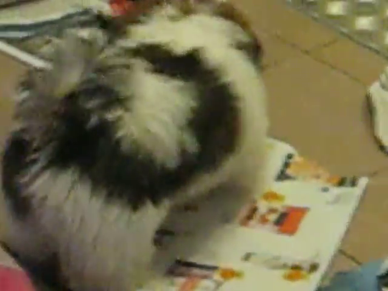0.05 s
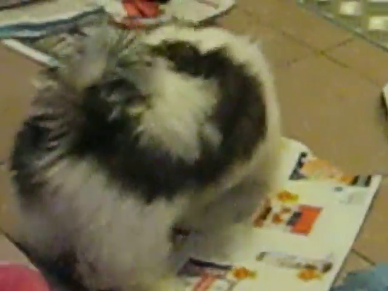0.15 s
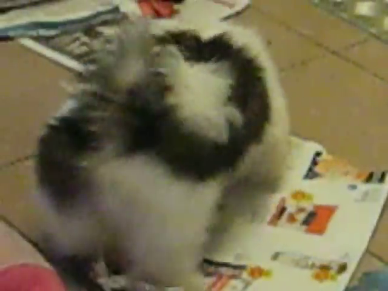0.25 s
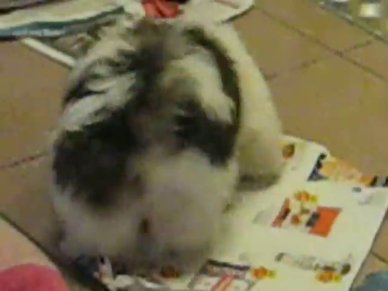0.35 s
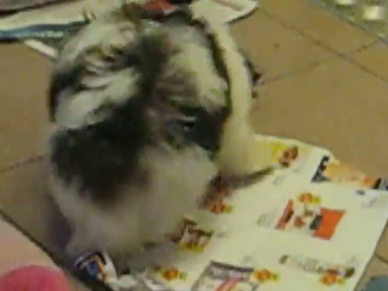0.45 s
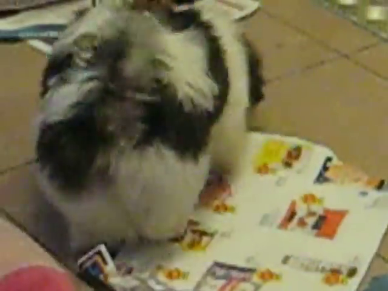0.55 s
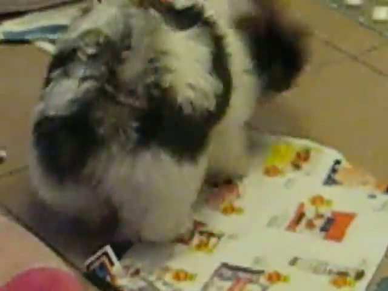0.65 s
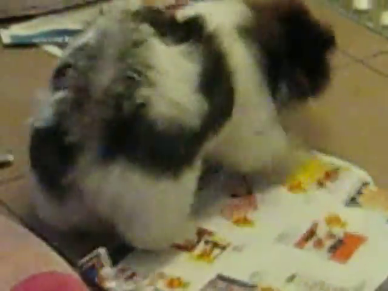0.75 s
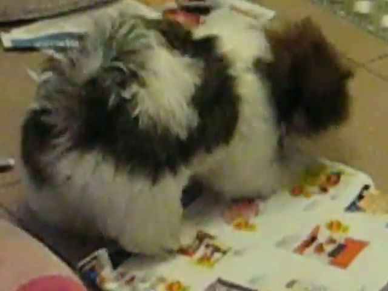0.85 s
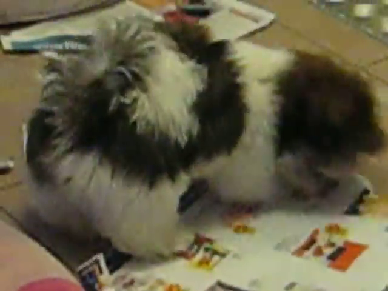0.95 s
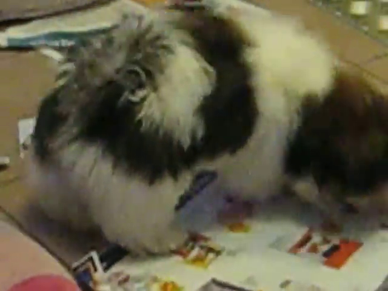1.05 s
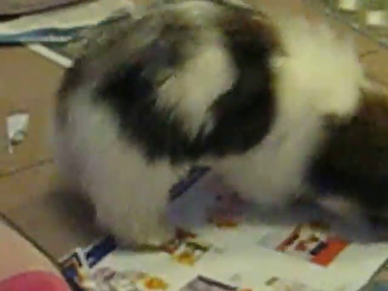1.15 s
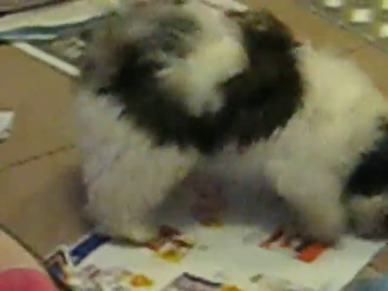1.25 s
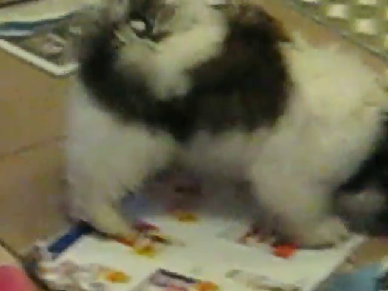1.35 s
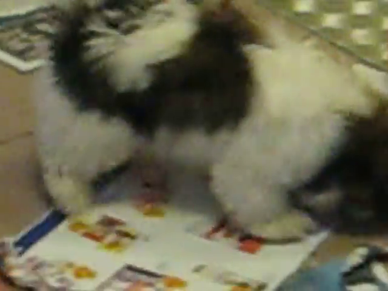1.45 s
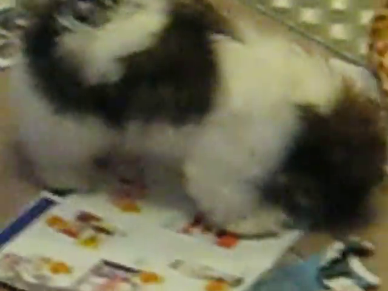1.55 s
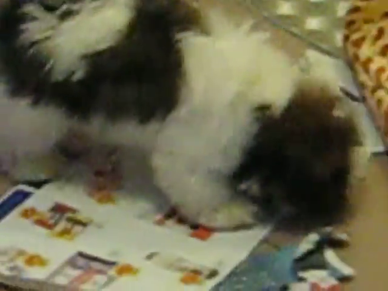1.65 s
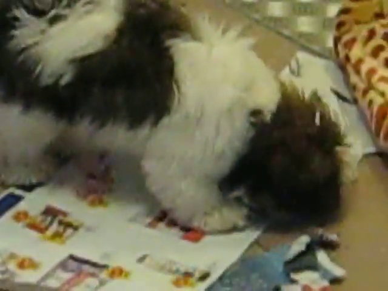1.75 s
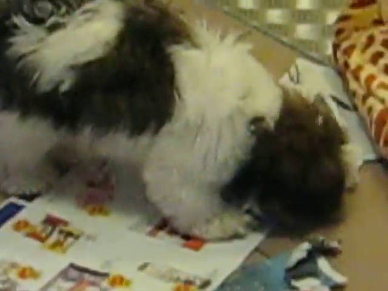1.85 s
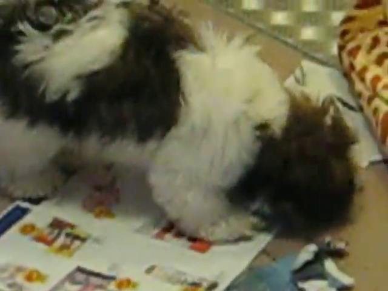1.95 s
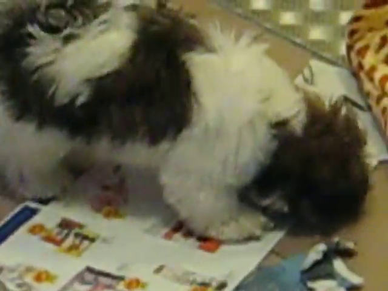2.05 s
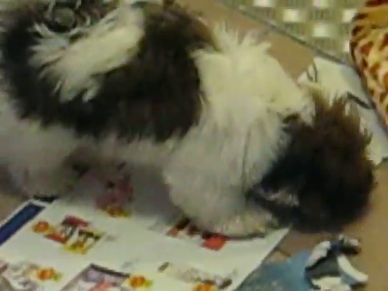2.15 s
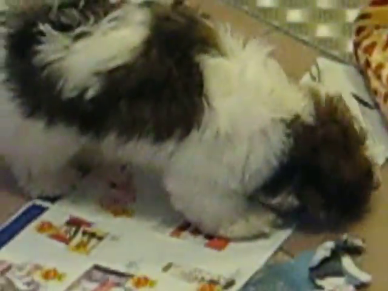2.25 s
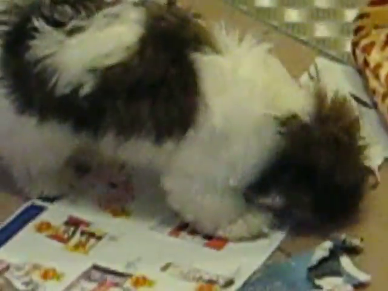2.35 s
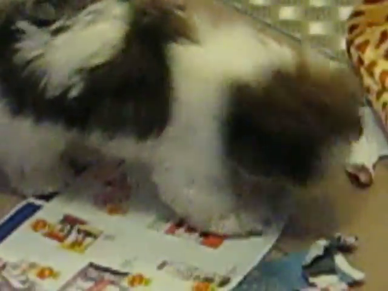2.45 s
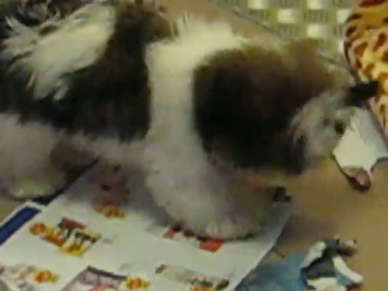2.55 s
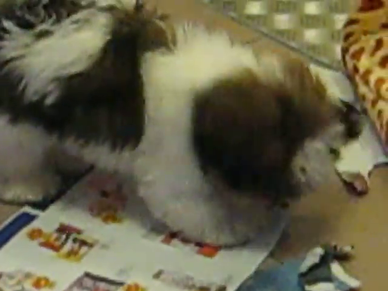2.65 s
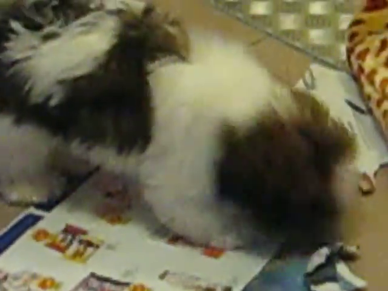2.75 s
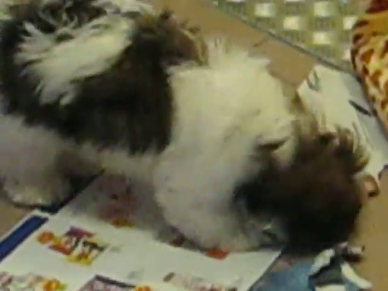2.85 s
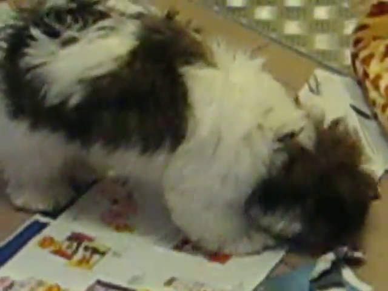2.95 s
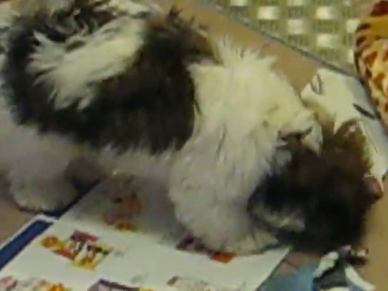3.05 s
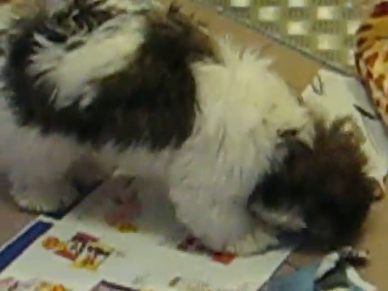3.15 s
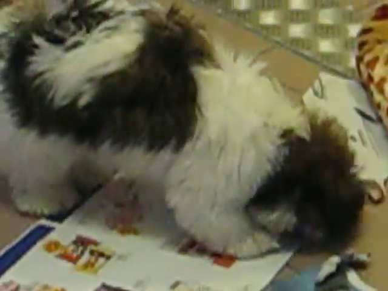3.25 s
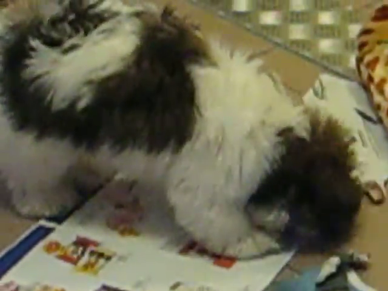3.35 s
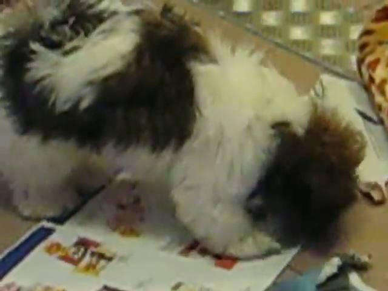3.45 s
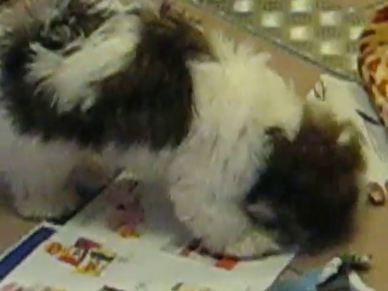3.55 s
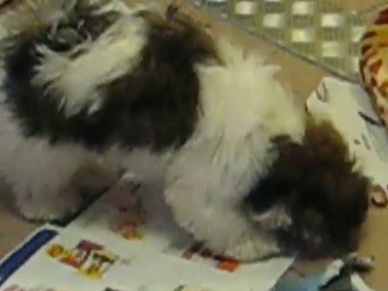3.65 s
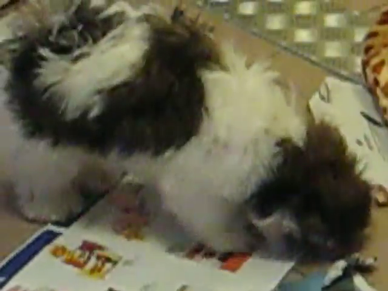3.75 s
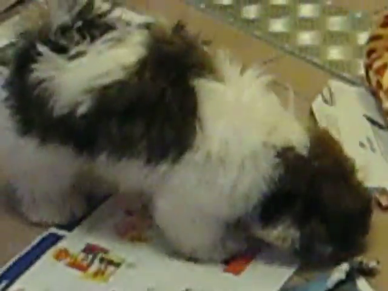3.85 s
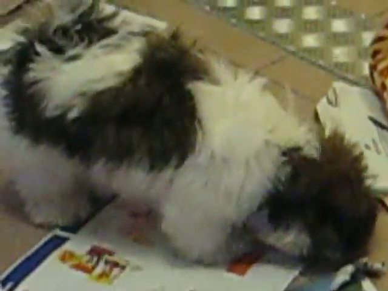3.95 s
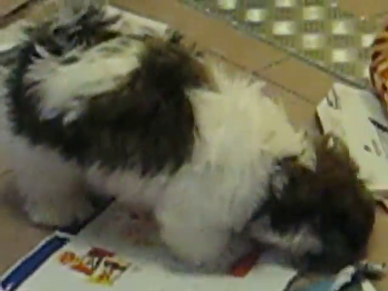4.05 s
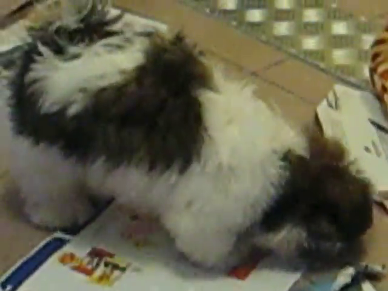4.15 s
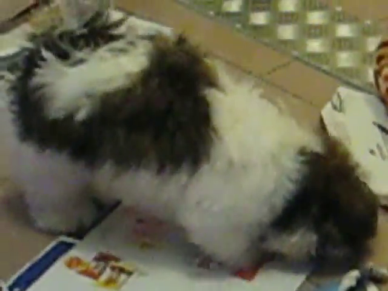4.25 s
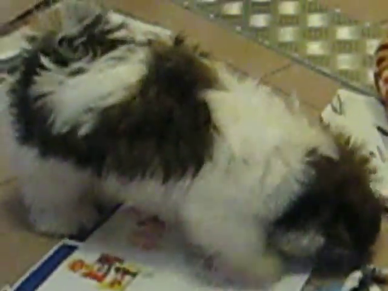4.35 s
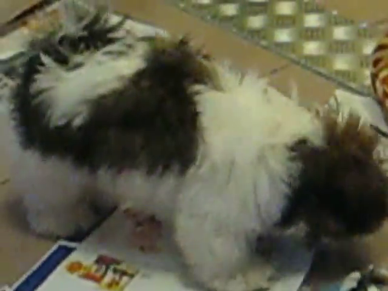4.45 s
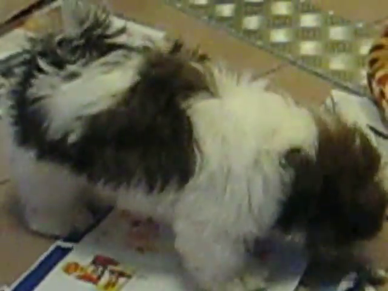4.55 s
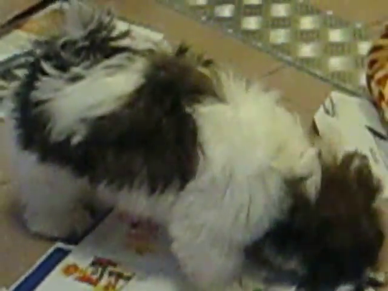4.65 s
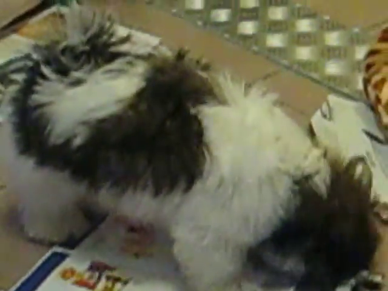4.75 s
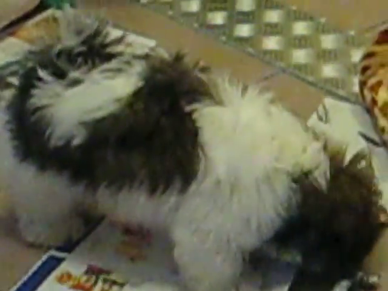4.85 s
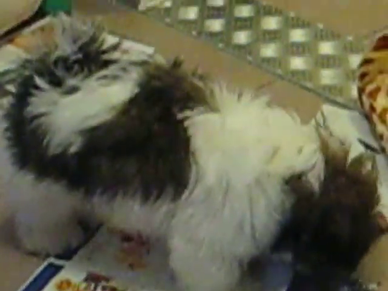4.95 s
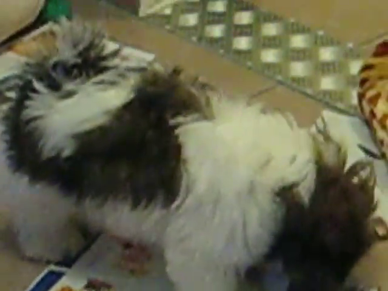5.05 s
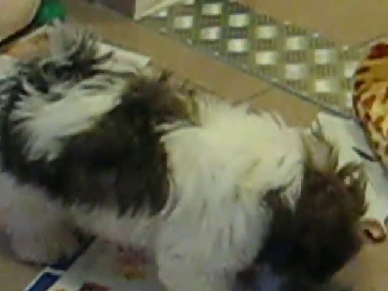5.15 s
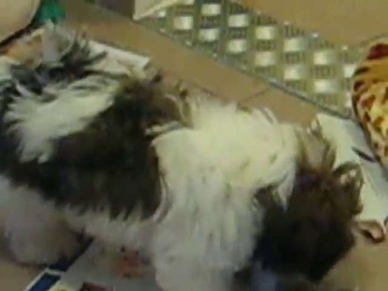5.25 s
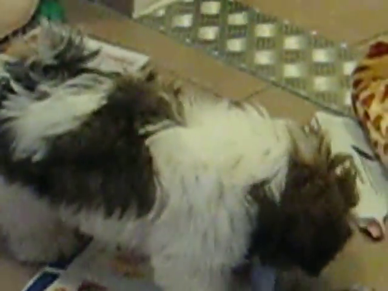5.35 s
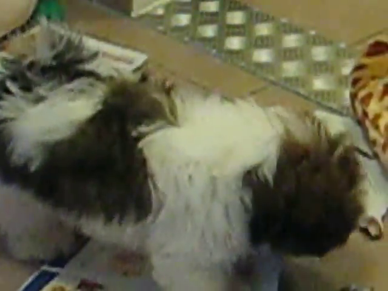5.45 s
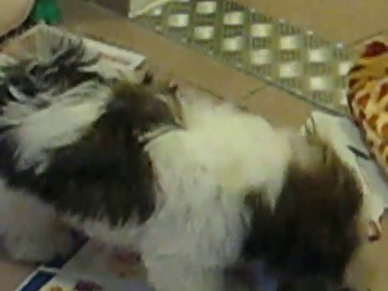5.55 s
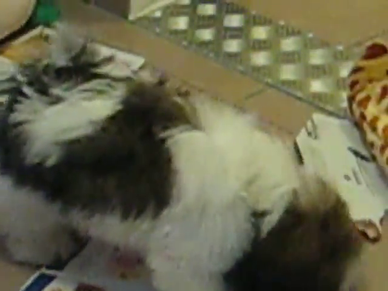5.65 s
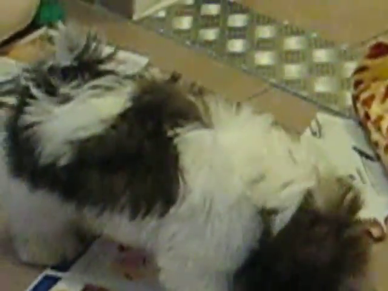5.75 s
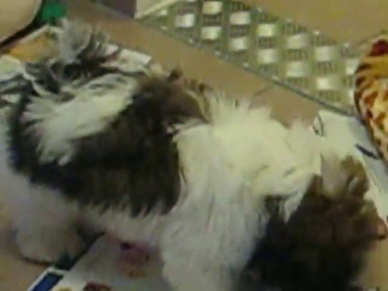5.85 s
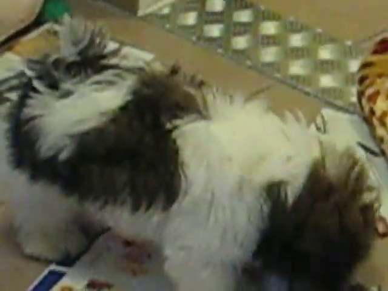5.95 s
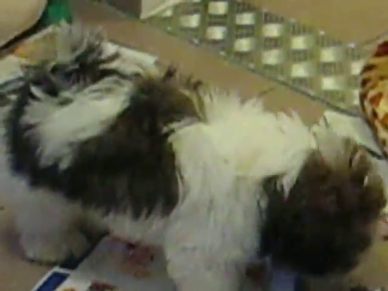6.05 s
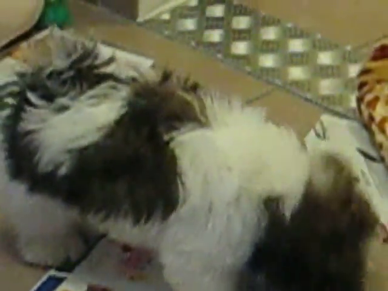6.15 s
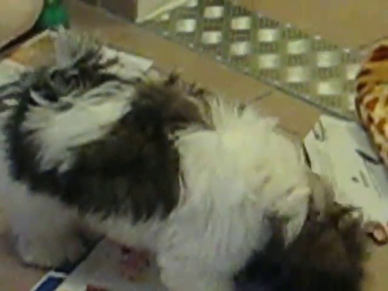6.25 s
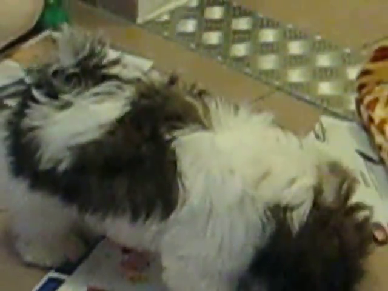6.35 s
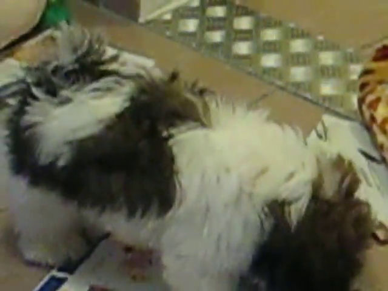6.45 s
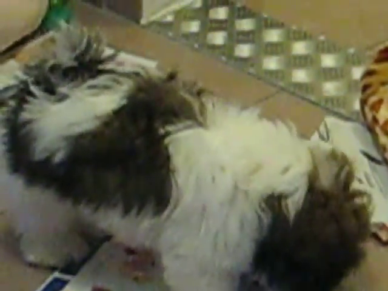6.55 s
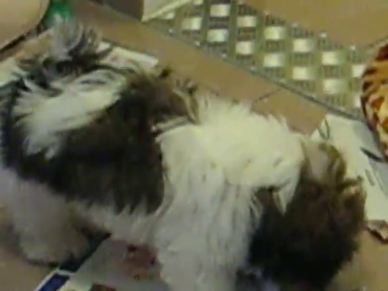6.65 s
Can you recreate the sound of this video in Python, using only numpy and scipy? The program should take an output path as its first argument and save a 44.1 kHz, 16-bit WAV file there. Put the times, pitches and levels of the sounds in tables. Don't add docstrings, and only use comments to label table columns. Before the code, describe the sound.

A puppy handles a sheet of paper on a tiled hallway floor, heard close through a small mono camera microphone. Constant soft hiss and a thin, high, finely pulsing whine lie beneath. Faint rustling opens, with small crackles near 0.4 seconds, a bright snap at 0.75, and a claw scuff with paper crackle around 1.1. Lighter ticks follow at 1.3 and 1.8. At 2.4 a sharp, crisp rip bursts out and quickly settles. It is nearly quiet until a small tick at 3.85 and a hard crease snap at 4.0. From 4.3 chewing brings uneven crinkles and little knocks, with a stronger crunch at 5.35. From about 5.6 to 6.7, rapid tugs tear the paper in dense, crackling bursts, strongest near 5.6, 5.9 and 6.2, with scuffs and a short hallway ring.

```python
import sys
import numpy as np
from scipy import signal
from scipy.fft import rfft, irfft
from scipy.io import wavfile
from scipy.ndimage import uniform_filter1d

SR = 44100
rng = np.random.default_rng(int(sys.argv[2]) if len(sys.argv) > 2 else 0)


def master_out(mix):
    frames = np.transpose(np.atleast_2d(mix))
    ceiling = np.clip(frames, -1, 1)
    pcm = np.round(ceiling * 32767).astype(np.int16)
    wavfile.write(sys.argv[1], SR, pcm)


def magnitude_from_level(level_db):
    exponent = np.asarray(level_db, float) / 20
    return 10 ** exponent


N = 295470

PARTS_HZ = (5670, 714, 2230, 10370)
# (frequency [Hz], gain [dB])
PAPER_SPECTRUM = [(120, -23.5), (250, -18), (400, -7), (800, -6), (5000, 2.5), (10000, 1), (13000, -5.5),
                  (16300, -19.5), (16750, -60)]


def read(points, hz):
    f, value = np.transpose(points)
    return np.interp(np.log(hz + 1), np.log(f + 1), value)


def evened(x):
    return x / np.sqrt(np.mean(x ** 2) + 1e-20)


def add(mix, start_s, sound):
    part = mix[round(start_s * SR):][:len(sound)]
    part += sound[:len(part)]


def coloured(x, gain):
    return irfft(rfft(x) * gain, len(x))


def effort():
    # (peak time [s], effort [dB], rise time [s], fall time [s],
    # tilt [dB/octave])
    moves = [(0.0, -49.5, .01, 0.089, 4), (0.35, -56, 0.54, .1, 5), (0.465, -39.5, 0.14, 0.11, 5.5),
             (0.62, -49.5, 0.54, 0.29, 4), (0.74, -48.5, 0.078, 0.074, 11),
             (0.756, -38.5, 0.0063, 0.14, 13), (1.07, -43.5, .002, .3, 4), (1.3, -47, .002, 0.13, 11),
             (1.51, -53, 0.15, 0.11, 5.5), (1.772, -59.5, 0.0018, 0.64, 15), (2.3, -57.5, 0.18, .2, 3),
             (2.37, -40.5, .002, 0.086, -3), (2.391, -29, 0.0022, 0.11, 0.8),
             (2.423, -29.5, .03, 0.067, 1.5), (2.456, -33.5, 0.076, 0.11, -2.5),
             (2.77, -57.5, 0.092, 0.17, 3), (3.845, -56, 0.0015, 0.3, 1), (3.979, -40, .002, 0.18, 6.5),
             (4.202, -43, .002, 0.03, 1.5), (4.229, -44, .002, 0.16, 4.5),
             (4.335, -35.5, 0.0019, 0.065, .1), (4.357, -37.5, 0.017, 0.13, -0.4),
               (4.64, -52, 0.13, 0.056, -1.2), (4.66, -48, .002, 0.054, -5), (4.76, -51.5, 0.12, 0.11, 0),
               (4.811, -40, 0.0015, 0.012, .1), (4.845, -41, 0.016, 0.036, -4.5),
               (4.905, -43, 0.066, 0.11, 1.5), (5.015, -40, .002, 0.011, -3),
               (5.051, -51.5, .01, 0.038, -6.5), (5.18, -50.5, 0.26, .05, -2),
               (5.191, -39.5, .002, 0.033, 2), (5.266, -38.5, 0.096, 0.028, -0.6),
               (5.346, -27, 0.0071, 0.036, -0.3), (5.45, -52, 0.063, 0.38, -2),
               (5.527, -42, .002, 0.16, -2),
             (5.581, -38.5, .002, 0.075, -3), (5.617, -36.5, .002, 0.073, -1.8),
               (5.634, -39.5, .02, 0.13, 4), (5.715, -36, .002, 0.1, -0.5), (5.764, -35.5, .002, 0.13, 3),
               (5.822, -34.5, 0.14, 0.023, -2.5), (5.9, -42, 0.054, 0.037, -3),
               (5.928, -31, 0.0023, 0.05, -3), (5.956, -33.5, 0.076, 0.085, 3.5),
               (6.16, -46, 0.24, .02, -2), (6.167, -42.5, .002, 0.041, -4.5),
               (6.189, -29.5, 0.0056, 0.039, -1.5), (6.254, -42.5, .04, 0.018, -2),
               (6.262, -38, .002, .1, -3), (6.296, -34, 0.047, 0.03, -1.5),
               (6.352, -42.5, 0.018, 0.031, -6), (6.412, -39, 0.058, 0.086, -4),
               (6.505, -37, .002, 0.053, 10), (6.527, -37, 0.055, 0.073, -2.6),
               (6.62, -47, .1, 0.071, -3.5), (6.647, -37.5, 0.0026, 0.024, -5), (6.69, -43, 0.068, .1, -1)]
    parts_db = (-1.44, -11.5, -2.5, -2.5)
    parts_pace = (1.08, 1.22, 0.96, 3.9)
    settle_db, settle_times = -20.5, 3.7

    power = np.zeros((4, N))
    octaves = np.log2(np.array(PARTS_HZ) / PARTS_HZ[0])
    pace = np.array(parts_pace)[:, None]
    for peak_s, db, rise_s, fall_s, tilt in moves:
        first = max(round((peak_s - 2 * rise_s) * SR), 0)
        t = np.arange(first, min(first + SR, N)) / SR - peak_s
        falls = np.maximum(t, 0) / max(fall_s, .005)
        shape = magnitude_from_level(-20 * falls * pace) + magnitude_from_level(settle_db - 20 * falls / settle_times)
        shape *= magnitude_from_level(20 * np.minimum(t, 0) / max(rise_s, .001))
        gain = magnitude_from_level(db + np.array(parts_db) + tilt * octaves)[:, None]
        power[:, first:first + len(t)] += (shape * gain) ** 2
    return np.sqrt(power)


def rustle(levels, clicks_per_s=3000, size_db=3.8, shared=.4, clump_db=2.5):
    hz = np.fft.rfftfreq(N, 1 / SR)
    happens, sign = rng.random((2, 5, N))
    sizes = magnitude_from_level(size_db * np.minimum(rng.exponential(1, (5, N)), 3)) * np.sign(sign - .5)
    common_drift = uniform_filter1d(rng.standard_normal(N), size=250)
    own_drift = uniform_filter1d(rng.standard_normal((5, N)), size=900)
    clumps = magnitude_from_level(clump_db * evened(common_drift)) * magnitude_from_level(clump_db * evened(own_drift))
    clicks = sizes * (happens < clicks_per_s / SR) * clumps

    out = np.zeros(N)
    log_centres = np.log(np.sort(PARTS_HZ))
    for k, level in enumerate(levels):
        share = np.interp(np.log(hz + 1), log_centres, np.argsort(PARTS_HZ) == k)
        mixed = shared * clicks[4] + (1 - shared) * clicks[k]
        part = coloured(mixed, np.sqrt(share) * magnitude_from_level(read(PAPER_SPECTRUM, hz)))
        out += evened(part) * uniform_filter1d(level, size=60, origin=25)
    return out


def hallway(x, wet_db=-1.5, build_s=0.006):
    # (frequency [Hz], t60 [s])
    decay = [(300, 0.42), (1300, 0.39), (3500, 0.31), (9000, 0.27), (15000, 0.41)]
    # (time [s], level [dB])
    echoes = [(.0025, -13.5), (.0043, -42), (.0062, -23), (.009, -64)]

    near = np.zeros(SR // 50)
    for delay_s, db in echoes:
        near[round(delay_s * SR)] = magnitude_from_level(db)
    hz, t, z = signal.stft(rng.standard_normal((3, SR // 2)), SR, nperseg=128)
    tails = signal.istft(z * magnitude_from_level(-60 * t / read(decay, hz)[:, None]), SR, nperseg=128)[1]
    tails *= np.minimum(np.arange(tails.shape[1]) / SR / build_s, 1)
    turns_per_s = 7
    turn = 2 * np.pi * (np.arange(N) / SR * turns_per_s + np.arange(3)[:, None] / 3)
    feeds = x * np.cos(turn) * np.sqrt(2 / 3)
    late = signal.oaconvolve(feeds, tails / np.linalg.norm(tails[0]), axes=1).sum(0)[:N]
    return x + signal.oaconvolve(x, near)[:N] + magnitude_from_level(wet_db) * late


def camera(whine_db=-55, overtone_db=-62, chirp_db=-70, hum_db=-76, chirp_s=0.0035):
    # (frequency [Hz], density [dB/Hz])
    hiss_spectrum = [(25, -4.5), (60, -3.5), (200, -1), (500, -2.5), (1000, -4.5), (3000, -8.5),
                     (7000, -11), (11500, -13), (13500, -17.5), (14500, -13), (15300, -10), (15750, -17)]
    hiss_db = -52
    whine_hz, chirp_hz, hum_hz = 7569.3, 12050, 11553
    picture_s, first_picture_s = 1 / 30, .0323

    t = np.arange(N) / SR
    hiss_gain = magnitude_from_level(read(hiss_spectrum, np.fft.rfftfreq(N, 1 / SR)))
    hiss = evened(coloured(rng.standard_normal(N), hiss_gain))
    since = (t - first_picture_s) % picture_s
    phase = 2 * np.pi * whine_hz * since
    whine = magnitude_from_level(whine_db) * np.sin(phase) + magnitude_from_level(overtone_db) * np.sin(2 * phase)
    whine *= np.clip(np.minimum(since, picture_s - since) / 0.00041, 0, 1)
    chirp = magnitude_from_level(chirp_db) * np.sin(2 * np.pi * chirp_hz * since)
    chirp *= np.exp(-((since - .008) / chirp_s) ** 2)
    hum = magnitude_from_level(hum_db) * np.sin(2 * np.pi * hum_hz * t)
    return magnitude_from_level(hiss_db) * hiss + np.sqrt(2) * (whine + chirp + hum)


def strays(level, per_s=80, low_hz=3000, high_hz=10000, above_effort_db=15):
    when, size, pitch = rng.random((round(per_s * N / SR), 3)).T
    db = 20 * np.log10(level[(when * N).astype(int)] + 1e-9) + above_effort_db - 10 * size
    centre_hz = low_hz * (high_hz / low_hz) ** pitch
    return list(zip(.01 + when * N / SR, db, centre_hz))


def snaps(rows, gain_db=2, ring_s=.00035, widen=1.35):
    flutter_share, flutter_s = .15, .004
    spread_share, spread_top_hz = .4, 3000
    size, lead = 2048, 64
    out, hz = np.zeros(N), np.fft.rfftfreq(size, 1 / SR)
    after = np.arange(size) / SR - lead / SR
    flutter = flutter_share * np.exp(-after / flutter_s) * (after > 0)
    shiver = rng.standard_normal((len(rows), size)) * (np.exp(-abs(after) / ring_s) + flutter)
    shiver[:, :lead] *= .3
    shiver[:, lead] = 4 * np.sign(shiver[:, lead])
    shiver[:, lead + 2] = -.6 * shiver[:, lead]
    for (time_s, db, centre_hz), z in zip(rows, shiver):
        spread_hz = min(spread_share * centre_hz, spread_top_hz)
        band = np.exp(-((hz - centre_hz) / (2 * widen * spread_hz)) ** 2)
        click = coloured(z, band * magnitude_from_level(read(PAPER_SPECTRUM, hz)))
        peak = abs(signal.hilbert(click)).max()
        add(out, time_s - lead / SR, magnitude_from_level(db + gain_db) * click / peak)
    return out


def scuffs():
    # (time [s], start level [dB], resonance [Hz], width [Hz], t60 [s])
    contacts = [(0.13, -62, 426, 43, 7), (.996, -51.5, 690, 81, 0.99), (1.069, -33.5, 2310, 650, 0.41),
                (1.072, -46.5, 990, 870, 0.94), (1.073, -42.5, 199, 38, 0.34),
                (1.078, -35.5, 5500, 610, 0.62), (1.105, -46, 214, 22, 0.36),
                (1.113, -39.5, 9150, 5000, 0.82), (1.301, -43, 3530, 550, 0.11),
                (1.775, -50, 4570, 330, 0.35), (1.78, -42, 8400, 2000, 0.37),
                (3.845, -40.5, 5500, 700, 0.059), (4.385, -46.5, 370, 170, 0.43),
                (4.68, -46, 600, 420, 0.42), (5.345, -44.5, 231, 96, 0.25), (5.349, -33.5, 3740, 300, 0.28),
                (5.35, -36, 2645, 200, 0.49), (5.355, -42.5, 1100, 180, 0.63), (5.515, -36, 3700, 500, .05),
                (5.526, -33, 3540, 660, 0.14), (5.528, -47, 187, 43, 0.36), (5.821, -28, 1500, 900, 0.22),
                (5.929, -32, 2000, 390, 0.33), (6.345, -33.5, 830, 270, 0.23)]
    out, t = np.zeros(N), np.arange(SR // 2) / SR
    hz = np.fft.rfftfreq(len(t), 1 / SR)
    noise = rng.standard_normal((len(contacts), len(t)))
    for (time_s, db, centre_hz, width_hz, t60_s), z in zip(contacts, noise):
        ring = coloured(z, 1 / (1 + ((hz - centre_hz) / width_hz) ** 2) ** 2)
        ring /= (abs(signal.hilbert(ring)) + 1e-9) ** .15
        add(out, time_s, evened(ring) * magnitude_from_level(db - 60 * t / t60_s) * np.minimum(t / 0.001, 1))
    return out


def scene():
    # (time [s], peak level [dB], centre [Hz])
    crease_snaps = [(0.4283, -25, 6600), (0.4845, -27, 3000), (0.7572, -17, 3000), (0.758, -11, 9100),
                    (0.7689, -19, 7000), (1.0697, -16, 2900), (1.1129, -22, 8800), (1.3025, -30, 6700),
                    (2.37, -26, 7900), (2.3749, -22, 9000), (2.3927, -17, 6300), (2.4117, -17, 8800),
                    (2.4218, -7, 8000), (2.4281, -10, 9400), (2.4361, -12, 4600), (2.4404, -14, 4100),
                    (2.4531, -13, 4600), (2.4732, -15, 5300), (3.6776, -33, 10800), (3.848, -29, 5500),
                    (3.8744, -26, 6300), (3.9788, -14, 10500), (3.9795, -7, 9100), (4.0061, -18, 7100),
                    (4.2023, -28, 6600), (4.2304, -22, 9400), (4.261, -26, 7100), (4.2713, -24, 10300),
                    (4.3359, -15, 6800), (4.3451, -21, 4700), (4.362, -21, 7200), (4.3834, -21, 8200),
                  (4.5516, -35, 3400), (4.6606, -21, 3100), (4.6821, -27, 3900), (4.7432, -29, 4100),
                  (4.81, -20, 3800), (4.8288, -13, 9000), (4.8393, -18, 4000), (4.8471, -19, 2500),
                  (4.8964, -25, 7000), (4.9111, -17, 7300), (4.9239, -23, 6600), (5.0166, -25, 3600),
                  (5.0509, -22, 3000), (5.1484, -26, 6800), (5.1917, -11, 6300), (5.2316, -17, 6500),
                  (5.2463, -13, 7000), (5.2645, -20, 6700), (5.2764, -17, 7900), (5.3384, -21, 5800),
                  (5.3488, -13, 7900), (5.5276, -20, 3600), (5.5527, -24, 3400), (5.5815, -20, 4900),
                    (5.6145, -7, 8000), (5.6289, -13, 7900), (5.7158, -17, 5900), (5.7324, -15, 6700),
                  (5.764, -19, 5700), (5.7877, -18, 5500), (5.8114, -15, 6100), (5.8161, -10, 7000),
                  (5.8217, -12, 4100), (5.8868, -20, 5500), (5.928, -12, 4700), (5.9428, -14, 6700),
                  (5.9516, -12, 7200), (5.9658, -13, 6900), (6.1692, -21, 4300), (6.1902, -10, 6200),
                  (6.2025, -17, 3800), (6.2182, -20, 3600), (6.2594, -7, 7100), (6.2776, -16, 6800),
                  (6.2885, -17, 5900), (6.3064, -18, 5700), (6.34, -18, 8000), (6.3511, -17, 5800),
                  (6.3995, -21, 4500), (6.4153, -20, 4000), (6.5101, -20, 5900), (6.5207, -19, 6400),
                  (6.6483, -19, 3200), (6.6783, -23, 6400)]
    levels = effort()
    creases = crease_snaps + strays(levels[0])
    paper = snaps(creases) + rustle(levels)
    mono = hallway(paper) + scuffs() + camera()
    return np.array([mono, mono])


def band_limit(x):
    return signal.sosfilt(signal.butter(12, 16650, fs=SR, output="sos"), x)


def record(dry):
    edge_hz, open_db = 15760, -53
    low = irfft(rfft(dry) * (np.fft.rfftfreq(N, 1 / SR) < edge_hz), N)
    top = dry - low
    top_db = 10 * np.log10(abs(uniform_filter1d(top ** 2, 128)) + 1e-14)
    opens = uniform_filter1d((top_db > open_db) * 1., 64)
    return band_limit(low + opens * top)


dry = scene()
out = record(dry)
master_out(out)
```